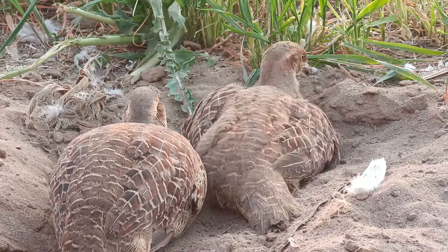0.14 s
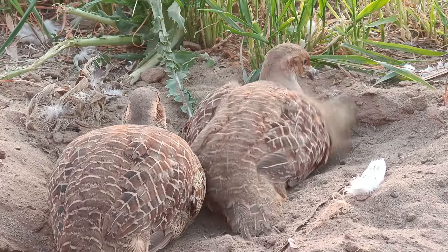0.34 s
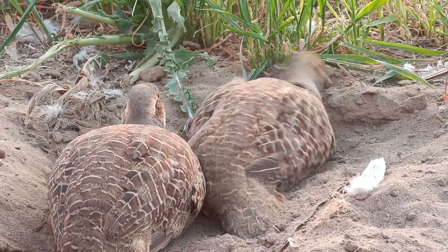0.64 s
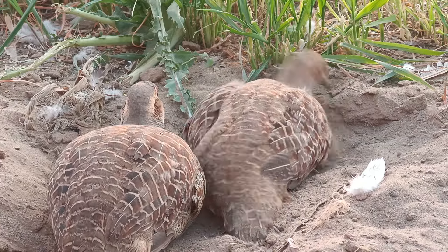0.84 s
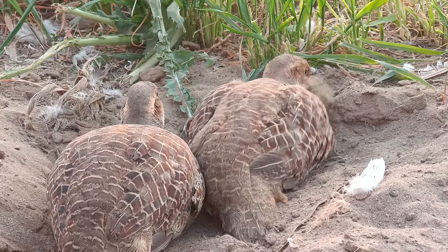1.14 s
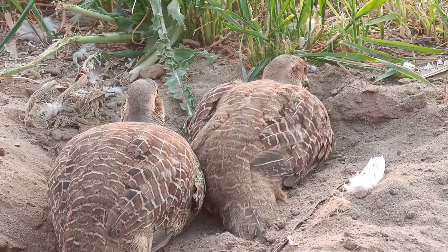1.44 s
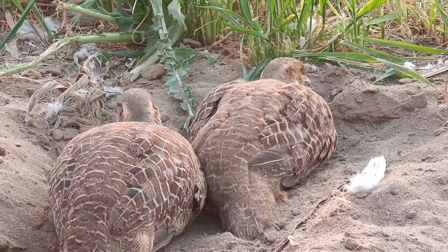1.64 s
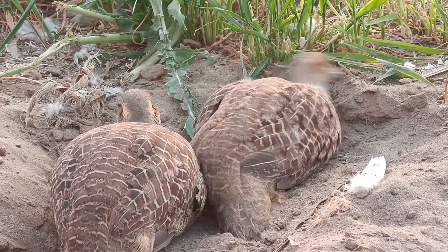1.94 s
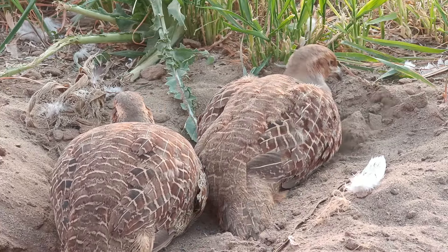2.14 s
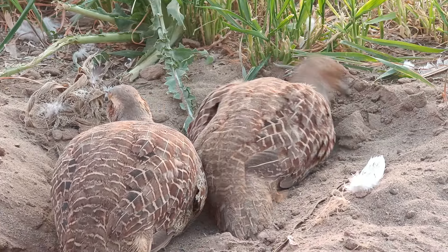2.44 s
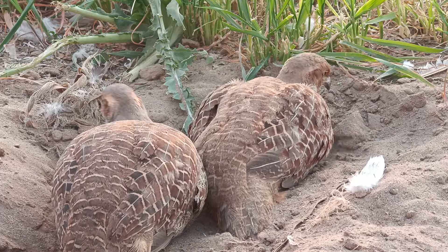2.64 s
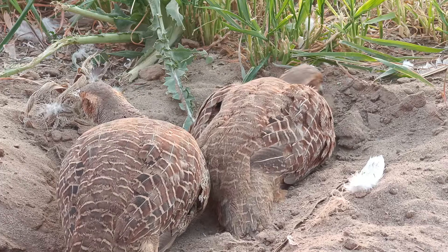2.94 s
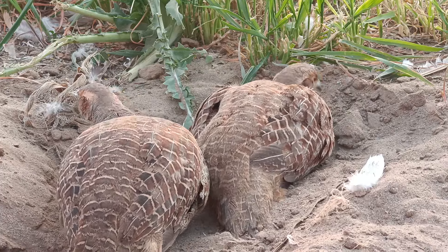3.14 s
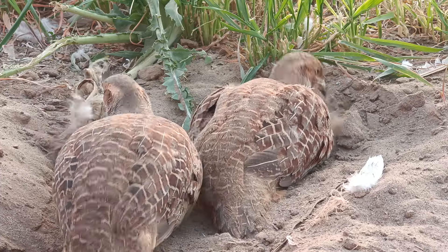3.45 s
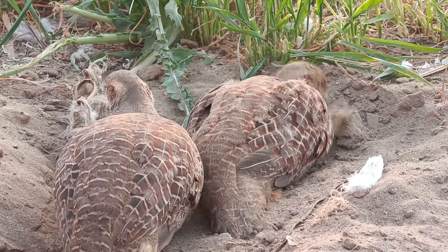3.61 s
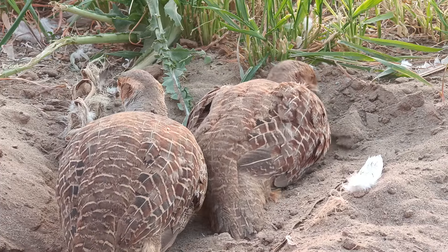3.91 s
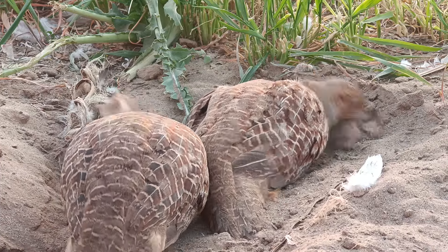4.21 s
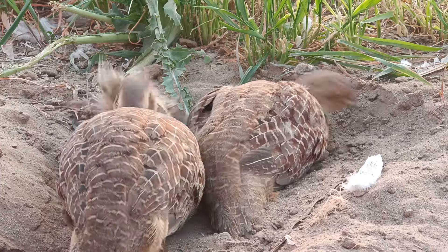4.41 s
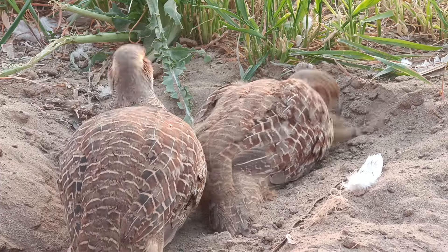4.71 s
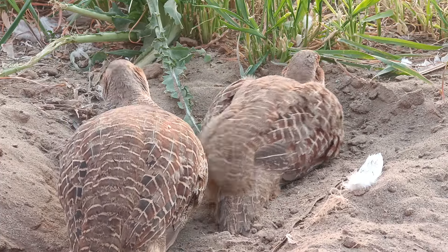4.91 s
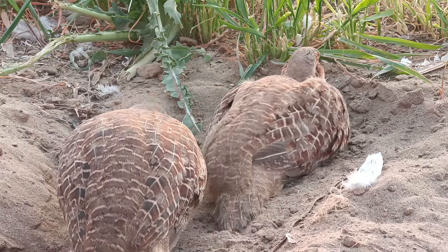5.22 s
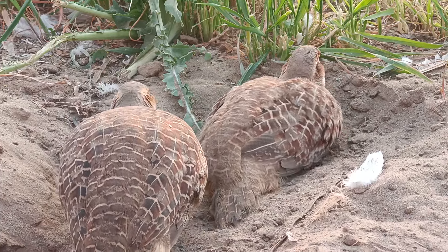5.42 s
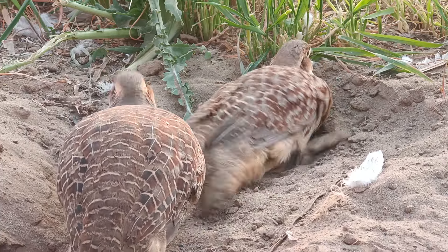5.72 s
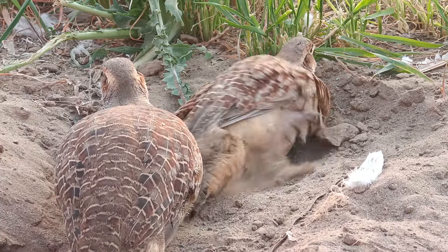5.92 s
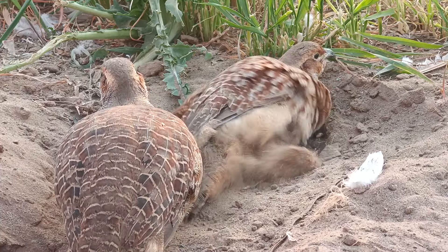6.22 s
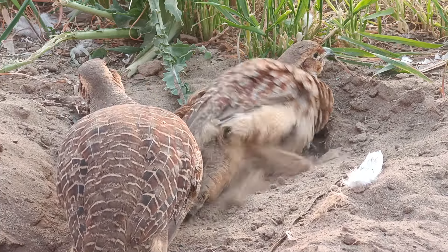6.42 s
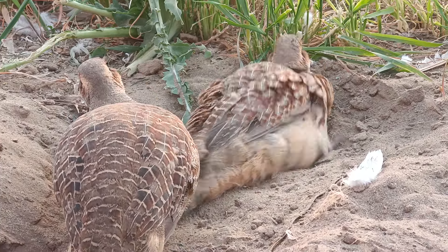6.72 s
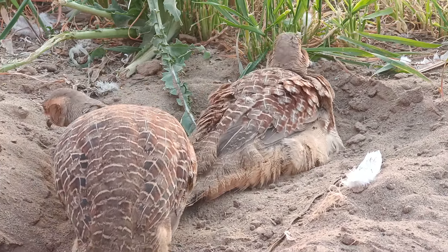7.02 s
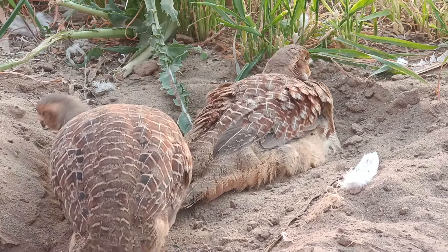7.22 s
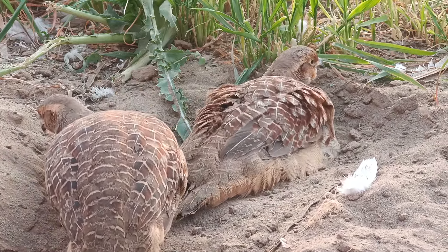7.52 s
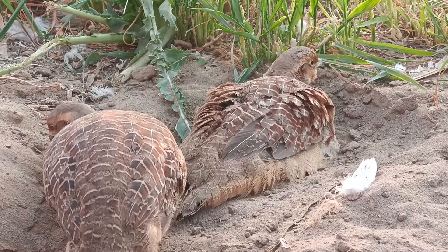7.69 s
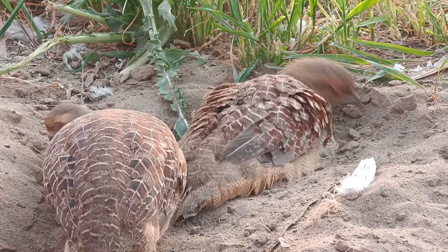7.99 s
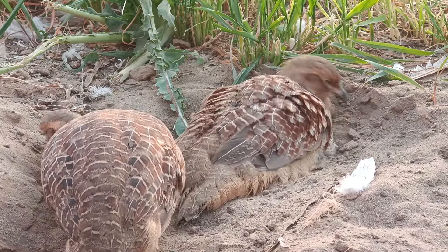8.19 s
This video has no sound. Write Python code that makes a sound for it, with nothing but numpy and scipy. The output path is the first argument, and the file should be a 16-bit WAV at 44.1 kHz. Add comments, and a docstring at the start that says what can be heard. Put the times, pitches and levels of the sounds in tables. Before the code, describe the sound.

Quiet open air with a faint low rumble and hush. Small dry flicks of bill and foot, grit and feathers are heard very close, along with low clucks and a squeak. After a sparse stretch come stronger sand scuffs, sharp stalk cracks, soft thumps, squeaky chirps and a low purr. High birdsong swoops in the distance, then a muffled far bang and final gritty flicks.

```python
"""Two partridges dust-bathe in dry sand at the edge of a field, close by, in rumbling, hushed open air.
First come flicks of bill and foot (shaped noise), soft clucks and a squeak (gliding tones), and far whistles.
Then scuffs stir the sand, feet bump it (swelling noise) and stalks snap (cracks ringing resonators).
The busy second half brings the loudest snaps, more squeaks, a husky purr and swooping birdsong (sines).
Near the end a dull, distant bang (decaying low noise) rolls away while the last flicks go on."""
import sys
import numpy as np
from scipy import signal
from scipy.fft import rfft, irfft, next_fast_len
from scipy.io import wavfile
from scipy.ndimage import uniform_filter1d

SR = 44100
rng = np.random.default_rng(int(sys.argv[2]) if len(sys.argv) > 2 else 0)


def wav_out(sig):
    """Save sig, one row per channel (or a flat mono array), as 16-bit PCM at SR to the path in sys.argv[1]."""
    wavfile.write(sys.argv[1], SR, np.round(np.clip(np.atleast_2d(sig).T, -1, 1) * 32767).astype(np.int16))


N = 368235
TIME = np.arange(N) / SR


def from_db(db):
    """Level to amplitude: 20 dB is a factor of ten."""
    return 10 ** (np.asarray(db) / 20)


def rms_one(x):
    """Normalisation: scale to a root-mean-square of 1."""
    return x / np.sqrt(np.mean(x ** 2) + 1e-20)


def band(x, low_hz, high_hz, order=2):
    """Causal Butterworth band-pass filtering."""
    edges = [low_hz, min(high_hz, .48 * SR)]
    return signal.sosfilt(signal.butter(order, edges, "band", fs=SR, output="sos"), x)


def coloured(x, spectrum):
    """Spectral shaping of a steady signal to rms 1; beyond the table it falls 12 dB per octave."""
    hz, db = np.transpose(spectrum)
    size = next_fast_len(len(x))
    log_hz = np.log(np.fft.rfftfreq(size, 1 / SR) + 1)
    beyond = np.maximum(np.log(hz[0]) - log_hz, 0) + np.maximum(log_hz - np.log(hz[-1]), 0)
    gain = from_db(np.interp(log_hz, np.log(hz), db)) * np.exp(-2 * beyond)
    return rms_one(irfft(rfft(x, size) * gain, size)[:len(x)])


def drift(rate, count=N):
    """Slow random modulation: chance values of spread 1, rate per second, joined by straight lines."""
    steps = np.arange(count) * rate / SR
    knots = rng.standard_normal(int(steps[-1]) + 2)
    return np.interp(steps, np.arange(len(knots)), knots)


def add(out, start, sound):
    """Superposition: mix a sound in at a time in seconds."""
    at = max(int(start * SR), 0)
    out[at:at + len(sound)] += sound[:max(N - at, 0)]


def grains(per_s, spread_db, count=N):
    """Granular impact noise: randomly timed tiny impulses of very uneven size."""
    size_db = spread_db * np.minimum(rng.exponential(1, count), 4)
    sizes = from_db(size_db) * rng.choice([-1, 1], count)
    return rms_one(sizes * (rng.random(count) < per_s / SR))


def sweeps(rise_s=0.0041, settle_s=0.007, push_settle_s=0.027, arch_db=3.5, flutter_db=3.5):
    """Friction noise: each stroke shoves the ground, brushes feathers and throws grit, then settles."""
    # The body scuffs through the sand. Each row: start in seconds, length in seconds,
    # rustle level in dB, weight behind it in dB re the rustle.
    scuffs = [(1.052, 0.16, -68.5, 1.5), (2.289, 0.064, -66.5, 5.5), (2.923, 0.11, -63.5, 3.5),
              (4.479, 0.16, -59, -3), (4.594, 0.13, -56, -3), (4.676, 0.012, -47, -9),
              (4.712, 0.14, -59, 2), (4.869, 0.1, -56.5, -2.5), (5.552, 0.12, -66, -6.5),
              (5.703, 0.13, -55, -13), (5.799, 0.02, -40, -12), (5.845, 0.19, -59, -6),
              (6.57, 0.071, -56.5, -12.5), (6.613, 0.073, -60.5, 0.5), (6.993, 0.017, -46.5, -16),
              (7.01, 0.13, -66.5, 0), (7.077, 0.029, -46, -30), (7.114, 0.34, -74, 1)]
    # Quick flicks of the bill or a foot. Each row: start in seconds, rustle level in dB,
    # grit thrown in dB re the rustle.
    flicks = [(0.052, -61.5, -17), (0.304, -65, -4), (0.407, -67.5, -27), (0.744, -65.5, -7.5),
              (0.958, -69, -6), (1.405, -73, -5), (1.61, -79, -14), (1.835, -74.5, -11),
              (2.073, -65.5, -19), (2.564, -66, -5), (3.468, -69.5, -14), (3.659, -69.5, -13),
              (4.066, -70.5, -4), (4.411, -64, 6.5), (6.237, -66, -9), (6.445, -66, -8), (7.368, -71, -5),
              (7.495, -68.5, 6), (7.752, -70.5, 7.5), (8.116, -66, -3.5), (8.317, -66, 14)]
    # Colours of shoved ground, brushed feathers and thrown grit. Each row: frequency in Hz, density in dB.
    push_colour = [(80, -0.5), (350, 0), (650, -1), (1000, -14.5), (1800, -22.5)]
    rustle_colour = [(600, -14), (1000, -4.5), (2300, -2), (2900, -1.5), (4000, 4), (5600, -1.5),
                     (7500, -11), (10000, -20.5)]
    grit_colour = [(5000, -9), (8800, -8), (12000, -10), (15500, -5.5), (17000, -17)]
    scuff_grit_db, flick_weight_db = -4, -1   # both re the rustle
    flick_s = 0.033
    restless_db, restless_swing_db, restless_hz = -89, 5.5, 11   # grit trickling between strokes
    trickle_db, trickle_s = -15, 0.022   # sand falling back: level re the stroke, decay time

    strokes = [(start, length, db + weight, db, db + scuff_grit_db)
               for start, length, db, weight in scuffs]
    strokes += [(start, flick_s, db + flick_weight_db, db, db + grit) for start, db, grit in flicks]
    power = np.zeros((3, N))   # push, rustle, grit
    power[2] = from_db(restless_db + restless_swing_db * drift(restless_hz)) ** 2
    settle = np.array([[push_settle_s], [settle_s], [settle_s]])
    for start, length, *levels in strokes:
        near = slice(max(int((start - .05) * SR), 0), int((start + length + .2) * SR))
        t = TIME[near] - start
        speed = np.sin(np.pi * np.clip(t / length, 0, 1) ** 0.49)   # fastest a quarter of the way in
        rise_and_settle = np.exp(np.minimum(t, 0) / rise_s - np.maximum(t - length, 0) / settle)
        shape = from_db(arch_db * (speed - 0.96)) * rise_and_settle
        trickle = (t > length) * from_db(trickle_db) * np.exp(-np.abs(t - length) / trickle_s)
        power[:, near] += from_db(levels)[:, None] ** 2 * (shape ** 2 + trickle ** 2)
    flutter = rms_one(from_db(flutter_db * drift(110)))
    push, rustle, grit = np.sqrt(power) * flutter
    return (push * coloured(rng.standard_normal(N), push_colour)
            + rustle * patchy(coloured(grains(per_s=8200, spread_db=2.5), rustle_colour))
            + grit * patchy(coloured(grains(per_s=3000, spread_db=3.0), grit_colour)))


def patchy(x, patchy_db=4.0):
    """Shifting spectrum: bands vary independently as different feathers and grains touch."""
    edges = np.geomspace(500, 17000, num=15)
    bands = zip(edges, edges[1:])
    return rms_one(sum(band(x, low, high) * from_db(patchy_db * drift(35)) for low, high in bands))


def crumbs(sweeping, per_s=900, spread_db=3.5, stirred_db=-10):
    """Impact excitation: crumbs tick against dry litter in step with the stirring of the sand."""
    stir = np.sqrt(np.maximum(uniform_filter1d(sweeping ** 2, size=500), 0))   # running rms over 11 ms
    ticks = rms_one(band(stalk(grains(per_s, spread_db)), 3000, 22000, order=1))
    return from_db(stirred_db) * stir * ticks


def stalk(x):
    """Modal resonance: parallel two-pole resonators, alternating in sign, for a dry stalk."""
    # Modes of a dry stalk. Each row: frequency in Hz, width in Hz, gain in dB.
    modes = [(510, 350, -0.5), (1613, 150, 1.5), (2256, 180, 2.5), (3830, 610, -3), (4630, 590, 0.5),
             (5860, 530, 1.5), (7230, 1100, -7.5), (8950, 370, -4), (10130, 660, -5), (12700, 610, -5.5),
             (15440, 490, -1)]
    out = 0
    for k, (hz, width, db) in enumerate(modes):
        r = np.exp(-np.pi * width / SR)
        poles = [1, -2 * r * np.cos(2 * np.pi * hz / SR), r * r]
        gain = (-1) ** k * from_db(db) * (1 - r * r) / 2
        out = out + gain * signal.lfilter([1, 0, -1], poles, x)
    return out


def snaps(crumble_db=-25, crumble_s=0.0045):
    """Brittle fracture: a quick run of fibre cracks rings the stalk, then a little crumbling."""
    # Stalks and crumbs breaking. Each row: start in seconds, decay time in seconds,
    # crack level in dB, splinter level in dB re the crack.
    breaks = [(1.0967, 0.008, -51.5, -13), (2.9134, 0.00013, -60.5, 11.5), (2.921, 0.00069, -59, 7),
              (2.9608, 0.00015, -55.5, 1), (2.9869, 0.000047, -49, 1.5), (4.417, .0009, -67.5, 21.5),
              (4.435, 0.0039, -59.5, 16), (4.591, 0.0053, -35, -1.5), (4.6995, 0.0025, -21.5, 3.5),
              (4.764, 0.011, -60.5, 4), (4.886, 0.0053, -61, 3), (4.944, 0.0035, -61, 1),
              (5.737, 0.00071, -28.5, -4), (5.7907, 0.00048, -45, 0), (5.859, .0004, -57, 8),
              (5.8808, 0.0015, -19, -10), (5.912, 0.001, -42, -13.5), (6.002, 0.003, -49.5, -3.5),
              (6.596, 0.0013, -50, -6.5), (6.751, 0.001, -56.5, -12), (6.7886, 0.0017, -61, -10),
              (6.996, 0.0026, -40, 4.5), (7.0052, 0.0016, -29, -14), (7.043, 0.0025, -40, -2.5),
              (7.057, 0.0065, -47.5, -1), (7.0806, 0.0037, -41.5, -7), (7.163, 0.00049, -41, -2),
              (7.764, 0.0028, -58, -1.5), (7.7864, 0.00041, -59.5, 5), (8.328, 0.0018, -48, 5.5)]
    # Ranges of thump, knock, crack and splinter. Each row: low edge in Hz, high edge in Hz.
    part_ranges = [(280, 420), (1000, 3860), (3600, 7600), (8200, 16000)]
    knock_at_2ms_db, knock_db_per_doubling = -9.5, 6.5   # slower breaks of thick stalks knock more
    thump_db = -35   # the ground's answer, re the crack

    out, t = np.zeros(N), TIME[:SR // 16]
    for start, decay, crack_db, splinter_db in breaks:
        force = np.exp(-(t / decay) ** 0.99) + from_db(crumble_db) * np.exp(-t / crumble_s)
        ringing = stalk(force * grains(per_s=24000, spread_db=7.0, count=len(t)))
        knock_db = knock_at_2ms_db + knock_db_per_doubling * np.log2(decay / .002)
        for (low, high), db in zip(part_ranges, (thump_db, knock_db, 0, splinter_db)):
            part = band(ringing, low, high, order=3)
            level = np.sqrt(np.sum(part ** 2) / (SR / 100))   # its energy spread over 10 ms
            add(out, start, from_db(crack_db + db) * part / level)
    return out


def thuds():
    """Damped low-frequency impact: a foot or the body bumps the ground; lower bumps last longer."""
    # Bumps. Each row: time in seconds, pitch in Hz, level in dB.
    bumps = [(0.987, 141, -62), (4.596, 370, -41), (4.77, 109, -59), (5.799, 125, -51.5), (5.884, 377, -42),
             (6.625, 560, -61), (6.626, 114, -53), (7.045, 526, -48.5), (7.312, 122, -50)]
    cycles_to_top, spread = 2.7, 1.45   # spread: pitch ratio from the centre to the edges

    out, t = np.zeros(N), TIME[:SR // 4]
    for start, hz, db in bumps:
        ring_s = cycles_to_top / hz
        swell = t / ring_s * np.exp(1 - t / ring_s)
        noise = rms_one(band(rng.standard_normal(len(t)), hz / spread, hz * spread))
        add(out, start - ring_s / 2, from_db(db) * swell * noise)
    return out


def contour(rows):
    """Piecewise-linear interpolation of one call's columns, with 2 ms fades at its ends."""
    s, *columns = np.transpose(rows)
    t = np.arange(s[0], s[-1], 1 / SR)
    fade = np.clip(np.minimum(t - s[0], s[-1] - t) / .002, 0, 1)
    return fade, [np.interp(t, s, c) for c in columns]


def moment(t, middle_s, half_s):
    """Flat-topped window: a swell from 0 to 1 and back."""
    return np.exp(-np.square(np.square((t - middle_s) / half_s)))


def squeaks(throat_hz=5000, third_db=-24, fall_db=-3.0, pressed_db=7, rasp_db=-20.5, jitter=0.009,
            rasp_jitter=0.035, usual_db=-40, steadiness=.45, shimmer_db=4, uneven=0.46):
    """Harmonic synthesis: a gliding tone; pressing lifts odd overtones, alternates cycles and rasps."""
    # Partridge squeaks and peeps, one curve each. Each row: time in seconds, pitch in Hz, level in dB.
    falling = [(0.49, 1840, -60), (0.502, 1749, -39.5), (0.514, 1656, -34.5), (0.522, 1385, -50.5),
               (0.53, 1082, -42), (0.544, 907, -40.5), (0.556, 1055, -46.5), (0.566, 1195, -51.5),
               (0.58, 958, -39.5), (0.588, 641, -32), (0.61, 619, -30.5), (0.625, 628, -37),
               (0.632, 540, -39)]
    wavering = [(4.488, 1786, -52), (4.498, 1774, -52.5), (4.505, 1827, -60), (4.514, 2070, -42),
                (4.534, 1826, -40.5), (4.542, 1860, -45.5), (4.551, 2190, -27.5), (4.559, 2400, -42.5),
                (4.56, 2250, -38), (4.567, 1900, -52)]
    flipping = [(5.672, 2240, -52), (5.696, 2165, -41.5), (5.706, 2076, -28.5), (5.715, 2084, -31.5),
                (5.721, 2860, -52.5), (5.723, 2900, -40), (5.734, 1980, -48.5)]
    rising = [(5.746, 3426, -49.5), (5.765, 3740, -51.5), (5.809, 4280, -53.5)]
    peep_faint = [(3.47, 1610, -70), (3.495, 1650, -65), (3.509, 1850, -79)]
    peep_low = [(7.02, 983, -64), (7.051, 1090, -46.5), (7.068, 1446, -56)]
    peep_high = [(8.329, 1460, -59), (8.336, 1653, -44.5), (8.35, 1730, -47.5)]
    # Pressed, rasping moments. Each row: middle in seconds, half length in seconds.
    rasps = [(0.604, 0.021), (4.557, 0.007), (5.724, 0.008)]
    # The voice breaks to its upper octave. Each row: middle in seconds, half length in seconds,
    # gain of the second harmonic in dB.
    octave_breaks = [(0.543, 0.0057, 6), (4.538, 0.014, 18)]
    second_harmonic_db = -13.5   # re the fundamental at usual_db; it swells and fades less

    out = np.zeros(N)
    for call in (falling, wavering, flipping, rising, peep_faint, peep_low, peep_high):
        fade, (hz, db) = contour(call)
        count = len(hz)
        t = call[0][0] + TIME[:count]
        rasp = sum(moment(t, middle, half) for middle, half in rasps)
        broken_db = sum(gain_db * moment(t, middle, half) for middle, half, gain_db in octave_breaks)
        second_db = second_harmonic_db + steadiness * (usual_db - db) + broken_db
        wobble = (jitter + rasp_jitter * rasp) * drift(900, count)
        phase = 2 * np.pi * np.cumsum(hz * (1 + wobble)) / SR
        pressed = pressed_db * rasp
        overtones_db = (second_db, third_db + pressed, third_db + fall_db, third_db + 2 * fall_db + pressed)
        overtones = 0
        for k, overtone_db in enumerate(overtones_db, 2):
            throat_gain = 1 / (1 + (k * hz / throat_hz) ** 10)
            shimmer = from_db(overtone_db + shimmer_db * drift(220, count))
            overtones = overtones + shimmer * throat_gain * np.sin(k * phase)
        # half the pitch makes strong and weak cycles alternate
        alternation = 1 + uneven * rasp * (np.cos(phase / 2) + drift(600, count) / 2)
        tone = np.sin(phase) + overtones * alternation
        pulsed_noise = (1 + np.cos(phase)) ** 4 * rng.standard_normal(count)
        slaps = rms_one(band(pulsed_noise, 810, 3300, order=3))
        voice = tone + from_db(rasp_db) * rasp * slaps
        add(out, call[0][0], np.sqrt(2) * fade * from_db(db) * voice)
    return out


def clucks(sag=0.088, waver=0.07, swell=0.68, husk_db=-4):
    """Two-tone synthesis: hollow notes swell fast and sag; purrs, rich in the upper tone, are husky."""
    # Low clucks with the bill closed. Each row: start in seconds, length in seconds,
    # mid-note pitch in Hz, level in dB.
    closed_bill_notes = [(0.407, 0.024, 340.6, -33.5), (0.428, 0.011, 355, -40.5),
                         (0.752, 0.034, 339, -53.5), (1.099, 0.016, 383, -40.5), (2.157, 0.05, 637, -61),
                         (2.195, 0.042, 338, -59.5), (2.294, 0.075, 693, -60.5), (4.919, 0.16, 322, -61),
                         (7.245, 0.082, 319, -54.5), (7.777, 0.089, 407, -63)]
    # Beats of a husky purr. Each row: start in seconds, level in dB.
    purr_beats = [(5.14, -61.5), (5.249, -60), (5.298, -54), (5.353, -51), (5.412, -57)]
    purr_beat_s, purr_hz = 0.055, 321
    upper_ratio = 1.72   # upper tone re the pitch
    cluck_upper_db, purr_upper_db = -28.5, 1   # strength of the upper tone and husk

    out = np.zeros(N)
    notes = [(*note, cluck_upper_db) for note in closed_bill_notes]
    notes += [(start, purr_beat_s, purr_hz, db, purr_upper_db) for start, db in purr_beats]
    for start, length, hz, db, upper_db in notes:
        u = np.linspace(0, 1, int(length * SR))
        pitch = hz * (1 + sag * (.5 - u) + waver * drift(130, len(u)))
        phase = 2 * np.pi * np.cumsum(pitch) / SR
        husk = from_db(husk_db) * rms_one(band(rng.standard_normal(len(u)), 160, 500, order=3))
        upper = (np.sin(upper_ratio * phase) + husk) / np.sqrt(2)
        tone = np.sin(phase) + from_db(upper_db) * upper
        envelope = np.abs(np.sin(np.pi * u ** swell))
        add(out, start, from_db(db) * np.sqrt(2) * envelope * tone)
    return out + from_db(-22) * scatter(out, t60=0.45)


def songbirds(waver=0.0073, flicker_db=3, arch=0.51):
    """Frequency-modulated sines: swooping notes and short glides; the farthest notes arch and blur."""
    # Swooping song notes, one curve each. Each row of a curve: time in seconds, pitch in Hz, level in dB.
    song_notes = [
        [(5.245, 5100, -68.5), (5.272, 5430, -53.5), (5.335, 5510, -53), (5.385, 5030, -42.5),
         (5.412, 4210, -50), (5.439, 2720, -68.5), (5.458, 4230, -49.5), (5.485, 4240, -64)],
        [(5.528, 6500, -67.5), (5.546, 5160, -45.5), (5.59, 4390, -48.5), (5.626, 2620, -64.5),
         (5.642, 3730, -55), (5.655, 4450, -62)],
        [(5.968, 6700, -66), (5.985, 6130, -50.5), (6.02, 5706, -50), (6.062, 5720, -57.5)],
    ]
    # Syllables of one glide. Each row: start in seconds, length in seconds, first pitch in Hz,
    # last pitch in Hz, bend (1 glides early, -1 late), level in dB.
    glides = [(5.279, 0.034, 4480, 5400, 0.5, -53), (5.482, 0.059, 6250, 4570, 0.99, -61),
              (5.93, 0.045, 6500, 5750, 0.45, -60.5)]
    # Far birds, blurred by distance. Each row: start in seconds, length in seconds,
    # top pitch in Hz, blur width in Hz, level in dB.
    far_notes = [(0.625, 0.6, 3796, 1300, -75.5), (1.193, 0.35, 3427, 16, -74),
                 (3.83, 0.11, 6150, 1900, -72.5), (3.981, 0.12, 5240, 2000, -73.5),
                 (4.737, 0.335, 3450, 30, -66.5), (6.265, 0.085, 3410, 90, -73.5)]
    far_sag = .035   # share of its pitch that a far note loses from the top of its arch to its ends

    out = np.zeros(N)
    notes = [(note[0][0], *contour(note)) for note in song_notes]
    for start, length, from_hz, to_hz, bend, db in glides:
        u = np.linspace(0, 1, int(length * SR))
        hz = from_hz + (to_hz - from_hz) * (u + bend * u * (1 - u))
        notes.append((start, np.abs(np.sin(np.pi * u)) ** arch, (hz, db)))
    for start, swell, (hz, db) in notes:
        phase = 2 * np.pi * np.cumsum(hz * (1 + waver * drift(400, len(hz)))) / SR
        level = from_db(db + flicker_db * drift(200, len(hz)))
        add(out, start, np.sqrt(2) * swell * level * np.sin(phase))
    for start, length, hz, width, db in far_notes:
        u = np.linspace(0, 1, int(length * SR))
        blur = warble(hz * (1 - far_sag * (2 * u - 1) ** 2), width, len(u))
        level = from_db(db + flicker_db * drift(22, len(u)))
        add(out, start, level * np.abs(np.sin(np.pi * u)) ** .3 * blur)
    return out


def warble(hz, width_hz, count, path_loss_db=-8.5, clear_hz=120):
    """Multipath interference: wandering copies blur a note; in a steady note the direct path stands out."""
    loss_db = path_loss_db * clear_hz / (clear_hz + width_hz)
    pitches = [hz + width_hz / 3 * drift(120, count) for path in range(5)]
    out = 0
    for k, pitch in enumerate(pitches):
        cycles = np.cumsum(pitch) / SR + rng.random()
        out = out + from_db(loss_db * k) * np.sin(2 * np.pi * cycles)
    return rms_one(out)


def scatter(x, t60):
    """Diffuse scattering: stems and leaves send sound back as an exponentially dying noise response."""
    t = TIME[:SR // 2]
    response = rng.standard_normal(len(t)) * from_db(-60 * t / t60) * (1 - np.exp(-t / .008))
    return signal.fftconvolve(x, response / np.linalg.norm(response))[:N]


def field(x, near_db=-5, far_db=-12):
    """Early and late reflections: quick ones off the nearest stems, a thin tail from the field."""
    return x + from_db(near_db) * scatter(x, t60=0.07) + from_db(far_db) * scatter(x, t60=.28)


def far_thud(start=7.879, db=-53, t60=0.38):
    """Exponential decay of low noise: one dull, distant bang that rolls away."""
    t = TIME[:SR // 2]
    out = np.zeros(N)
    boom = band(band(rng.standard_normal(len(t)), 286, 610, order=1), 150, 1560)
    add(out, start, from_db(db - 60 * t / t60) * rms_one(boom))
    return out


def open_air(split_hz=210):
    """Stationary and modulated noise: a lumpy low rumble under a faint, even hush."""
    # Colour of the open air. Each row: frequency in Hz, density in dB.
    air_colour = [(30, -25), (75, 0), (112, 0), (364, -9.5), (962, -18), (3980, -25), (8080, -36.5),
                  (11400, -45), (14800, -31), (16000, -37)]
    rumble_db, lumpy_db = -68.5, 2.8   # level and swings of the rumble
    hush_db = -72.5   # level re the air's 140 to 3600 Hz band

    noise = coloured(rng.standard_normal(N), air_colour)
    rumble = rms_one(band(noise, 12, split_hz, order=3) * from_db(lumpy_db * drift(13)))
    hush = band(noise, split_hz, 18000, order=3) / np.std(band(noise, 140, 3600))
    return from_db(rumble_db) * rumble + from_db(hush_db) * hush


def scene():
    """Superposition: the partridges close by with a short scatter, the field behind them."""
    sand = sweeps()
    near = sand + crumbs(sand) + snaps() + thuds() + squeaks() + clucks()
    near_scatter = from_db(-20.5) * scatter(near, t60=0.038)
    background = field(songbirds()) + far_thud() + open_air()
    return (near + near_scatter + background)[None]


def record(dry):
    """Elliptic low-pass filtering: the top is cut steeply at 15950 Hz."""
    return signal.sosfilt(signal.ellip(10, .1, 80, 15950, fs=SR, output="sos"), dry)


dry = scene()
out = record(dry)
wav_out(out)
```